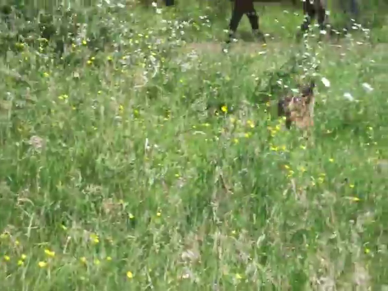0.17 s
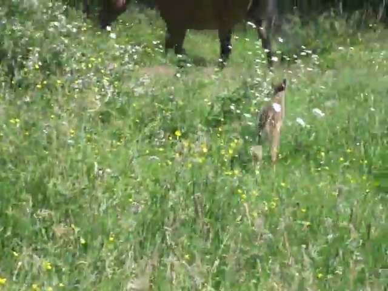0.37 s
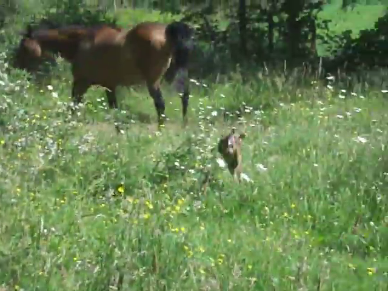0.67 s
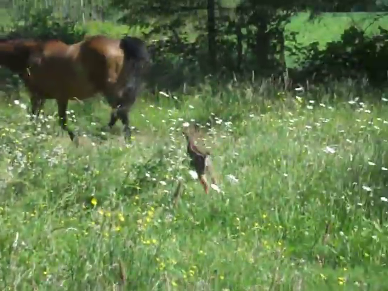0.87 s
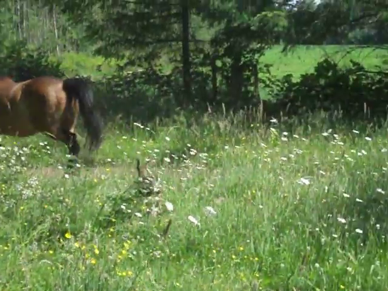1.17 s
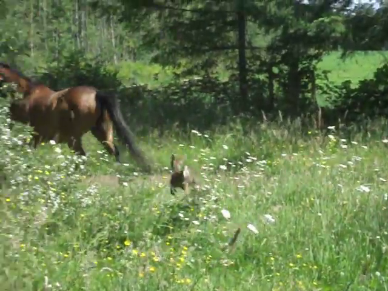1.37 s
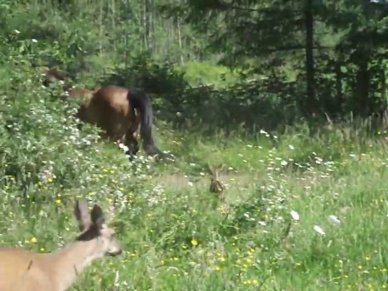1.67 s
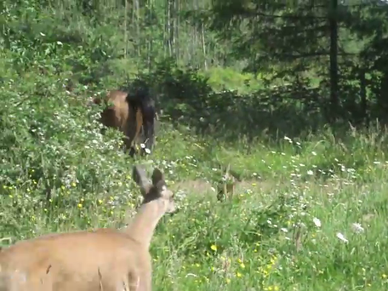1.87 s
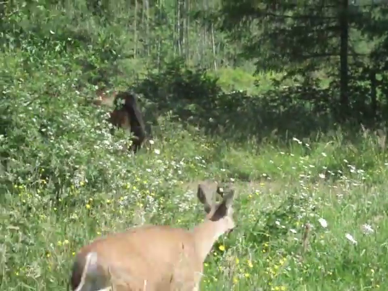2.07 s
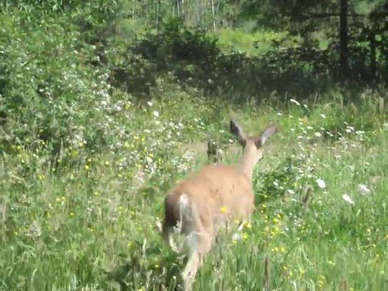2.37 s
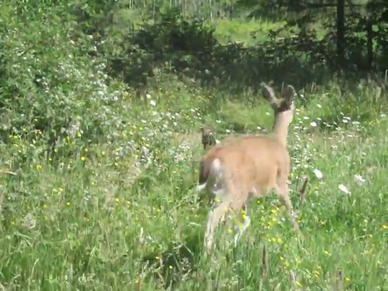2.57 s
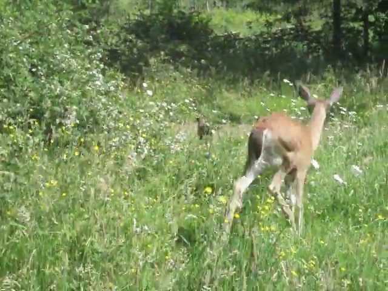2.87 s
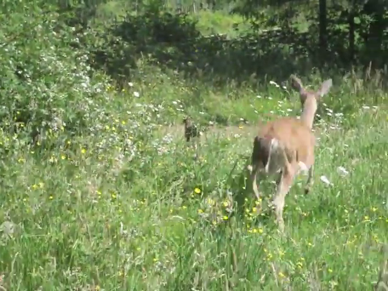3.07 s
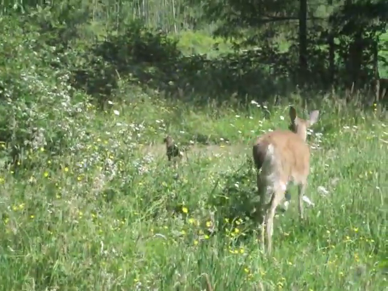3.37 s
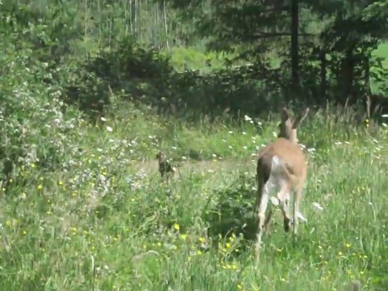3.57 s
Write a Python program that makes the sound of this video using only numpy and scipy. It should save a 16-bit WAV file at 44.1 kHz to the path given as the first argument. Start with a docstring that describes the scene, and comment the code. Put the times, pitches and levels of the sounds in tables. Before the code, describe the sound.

Uneven low wind flutter and thin leafy hiss outdoors, two hard overloaded plastic clicks near the start, later two short arched bird chirps with tree echoes and small crackling grass snaps between them.

```python
"""Gusts buffet the port of a small camera microphone in a meadow: bands of low noise with drawn levels, and one pop.
Grass and leaves hiss as noise with faint crackles; grass snaps under passing animals as short noise bursts.
A bird gives two arched chirps and a farther one whistles: gliding sines with scattered echoes from the trees.
The camera body clicks as ringing modes, loudly enough to overload the recorder. The microphone has a strong
presence peak and the recorder a low treble limit."""
import sys
import numpy as np
from scipy import signal
from scipy.fft import rfft, irfft
from scipy.io import wavfile

SR = 44100
rng = np.random.default_rng(int(sys.argv[2]) if len(sys.argv) > 2 else 0)


def gain_from_db(level_db):
    """Turn a decibel level (scalar or array-like) into a linear amplitude factor."""
    decades = np.asarray(level_db, float) / 20
    return 10 ** decades


def transcribe(u):
    """Save the signal u as a 16-bit wav file named by the first command-line argument.

    u: samples, shape (n,) or (channels, n), limited to [-1, 1]; the rate is SR.
    q: integer samples, one column per channel.
    """
    v = np.clip(np.atleast_2d(u).T, -1, 1)
    q = np.round(v * 32767).astype(np.int16)
    wavfile.write(sys.argv[1], SR, q)


N = 163611  # length in samples


def in_time(rows, column=1):
    """Control curve: linear interpolation of a column over the times in the first column."""
    rows = np.array(rows)
    return np.interp(np.arange(N) / SR, rows[:, 0], rows[:, column])


def rms_one(x):
    """Normalization of the mean power to 1."""
    return x / np.sqrt(np.mean(x ** 2) + 1e-20)


def drift(rate_hz):
    """Slow random fluctuation of rms 1: white noise through two equal real poles at rate_hz."""
    decimation = 40
    pole = np.exp(-2 * np.pi * rate_hz * decimation / SR)
    run_in = 2000
    white = rng.standard_normal(N // decimation + run_in + 2)
    slow = signal.lfilter([1], [1, -2 * pole, pole * pole], white)[run_in:]
    return np.interp(np.arange(N) / decimation, np.arange(len(slow)), rms_one(slow))


def noise_band(low_hz, high_hz):
    """Band-limited Gaussian noise of rms 1, taken after the filter has settled for a second."""
    sos = signal.butter(2, [low_hz, high_hz], "band", fs=SR, output="sos")
    return rms_one(signal.sosfilt(sos, rng.standard_normal(N + SR))[SR:])


def hiss():
    """Turbulent rustle of grass and leaves: patchy white noise plus a random train of crackle impulses."""
    # Each row: time in seconds, relative level in dB.
    hiss_rows = [(0.1, -35), (0.13, -32.5), (0.26, -33), (0.87, -33), (1.38, -33.5), (1.82, -33.5),
                 (2.36, -32.5), (2.64, -31.5), (3.04, -33.5), (3.49, -33), (3.7, -33.5)]
    crackles_per_s, crackle_db = 250, -18.5
    struck = rng.random(N) < crackles_per_s / SR
    size_db = 3.3 * rng.exponential(1, N).clip(0, 3)
    crackles = struck * rng.choice([-1, 1], N) * gain_from_db(size_db)
    patchy_db = 0.68 * drift(3.9)
    rustle = gain_from_db(in_time(hiss_rows) + 15.5 + patchy_db) * rng.standard_normal(N)
    return rustle + gain_from_db(crackle_db) * crackles


def trees():
    """Scattering from the tree line: sparse random echoes under exponential decay, total energy 1."""
    t60_s, delay_s, echoes_per_s = 0.44, 0.0089, 830
    t = np.arange(SR // 2) / SR
    sparse = (rng.random(len(t)) < echoes_per_s / SR) * rng.standard_normal(len(t))
    response = sparse * gain_from_db(-60 * t / t60_s) * (t > delay_s)
    return response / np.sqrt(np.sum(response ** 2))


def bird(calls, echo_db):
    """Frequency-modulated sine strokes that bend over at the top pitch, with their echoes by convolution."""
    rise_arch, fall_arch = 1.8, 2.6  # exponents: higher stays longer near the top pitch
    low_loss_db = 19  # low notes are weaker
    loudest_at = 0.43  # share of the way, in time, from the top pitch to the low one
    edge_s, hoarse = 0.004, 0.2  # soft ends; rms share of amplitude flicker
    out = np.zeros(N + SR)
    flicker = 1 + hoarse * drift(60)
    for start_s, length_s, from_hz, to_hz, db in calls:
        t = np.arange(int(length_s * SR)) / SR
        falling = from_hz > to_hz
        away = t / length_s if falling else 1 - t / length_s  # 0 at the top pitch, 1 at the low one
        arch = fall_arch if falling else rise_arch
        hz = max(from_hz, to_hz) - abs(to_hz - from_hz) * away ** arch
        loss_db = low_loss_db * ((away - loudest_at) / (1 - loudest_at)) ** 2
        ends = np.clip(np.minimum(t, length_s - t) / edge_s, 0, 1)
        first = int(start_s * SR)
        phase = 2 * np.pi * np.cumsum(hz) / SR
        out[first:first + len(t)] += gain_from_db(db - loss_db) * ends * np.sin(phase)
    direct = out[:N] * flicker
    return direct + gain_from_db(echo_db) * signal.fftconvolve(direct, trees())[:N]


def far_bird():
    """Short whistles from a distance, the scattered sound 9 dB under the direct."""
    # Each row: start in seconds, length in seconds, first pitch in Hz, last pitch in Hz, relative level in dB.
    whistle_rows = [(2.650, .03, 1300, 1690, -41), (2.678, .025, 1690, 1350, -41),
                    (2.715, .035, 1500, 1720, -44)]
    return gain_from_db(19.5) * bird(whistle_rows, echo_db=-9.0)


def near_bird():
    """Arched chirps of joined rising and falling strokes, the scattered sound 3 dB under the direct."""
    # Each row: start in seconds, length in seconds, first pitch in Hz, last pitch in Hz, relative level in dB.
    chirp_rows = [(1.991, .047, 1260, 2950, -13), (2.044, .021, 2824, 1500, -13),
                  (2.058, 0.02, 2794, 1900, -23), (3.264, .026, 1894, 2850, -19.5),
                  (3.269, .052, 1268, 3000, -14), (3.321, 0.019, 2864, 1500, -11.5),
                  (3.338, .016, 2685, 1800, -15)]
    return bird(chirp_rows, echo_db=-3.0)


def snaps():
    """Brittle fracture of grass: one impulse, then noise under a Gaussian decay, band-limited."""
    # Each row: start in seconds, relative level in dB, time in seconds for the noise to fall to 1/e.
    snap_rows = [(1.710, -32, 0.03), (2.555, -30.5, 0.021), (2.573, -33, 0.011), (2.590, -27, 0.0086),
                 (2.678, -36, .008), (2.784, -30, 0.01), (2.80, -36, .012), (2.898, -32, .014),
                 (2.959, -37.5, 0.0074), (1.814, -45, .008), (3.3625, -18, 0.0029), (3.51, -64, 0.0055)]
    first_break = 8.2  # impulse height over the rms of the noise at its start
    out = np.zeros(N + SR)
    for start_s, db, length_s in snap_rows:
        t = np.arange(int(4 * length_s * SR)) / SR
        burst = rng.standard_normal(len(t)) * np.exp(-(t / length_s) ** 2)
        burst[0] = first_break
        first = int(start_s * SR)
        out[first:first + len(t)] += gain_from_db(db) * burst
    sos = signal.butter(2, [1100, 3700], "band", fs=SR, output="sos")
    return gain_from_db(19.5) * signal.sosfilt(sos, out[:N])


def camera_clicks():
    """Modal synthesis: each noisy contact force excites the damped resonances of the plastic body."""
    # Each row: start in seconds, peak level in dB ahead of the bass cut, contact time constant in seconds,
    # tilt of the modes in dB per octave.
    click_rows = [(.4419, 2, .0013, -.5), (.4619, -2, .0006, 4.0), (.5140, 4, .0017, 1.5),
                  (.5186, -1, .0009, 2.5)]
    # Modes of the body. Each row: frequency in Hz, relative level in dB, 60 dB decay time in seconds.
    body_modes = [(720, -27.5, 0.018), (972, -22, 0.021), (1231, -13.5, 0.013), (1730, -17, 0.013),
                  (1854, -13, 0.023), (2246, -6.5, 0.0072), (2530, -5, 0.014), (2962, -3.5, 0.015),
                  (3500, -9.5, 0.0058), (4490, -21.5, 0.0048)]
    out = np.zeros(N)
    t = np.arange(SR // 20) / SR
    for start_s, peak_db, contact_s, tilt_db in click_rows:
        force_shape = np.sqrt(t / contact_s) * np.exp(-(t / contact_s) ** 2)
        force = rng.standard_normal(len(t)) * force_shape + 1e-18
        rung = 0
        for k, (hz, db, t60_s) in enumerate(body_modes):
            radius, angle = gain_from_db(-60 / (t60_s * SR)), 2 * np.pi * hz / SR
            poles = [1, -2 * radius * np.cos(angle), radius * radius]
            mode = signal.lfilter([0, np.sin(angle)], poles, force)
            gain = (-1) ** k * gain_from_db(db + tilt_db * np.log2(hz / 3500))  # neighbours in opposite polarity
            rung = rung + gain * mode / np.abs(mode).max()
        first = int(start_s * SR)
        out[first:first + len(t)] += gain_from_db(peak_db) * rung / np.abs(rung).max()
    # little bass gets through
    return signal.sosfilt(signal.butter(2, 400, "high", fs=SR, output="sos"), out)


def pop():
    """Impulse response of a second-order low-pass: one eddy pops on the port as a dull pressure kick."""
    start_s, level_db, corner_hz = 2.279, -10, 222
    kick = np.zeros(N) + 1e-18
    kick[int(start_s * SR)] = gain_from_db(level_db) * SR / (2 * np.pi * corner_hz)  # offsets the filter's loss of height
    return signal.sosfilt(signal.butter(2, corner_hz, fs=SR, output="sos"), kick)


def wind():
    """Turbulent pressure on the port: slow swell plus eddy flutter whose spectrum falls with frequency."""
    # Slow swell. Each row: time in seconds, relative level in dB.
    swell_rows = [(0.04, -16), (0.08, -19), (0.13, -38), (0.15, -28.5), (0.32, -18), (0.44, -33),
                  (0.7, -25), (0.74, -38.5), (1.06, -25.5), (1.27, -34), (1.52, -22.5), (1.57, -31.5),
                  (1.6, -25.5), (1.94, -25.5), (1.97, -23.5), (2.18, -29.5), (2.29, -19.5), (2.33, -32),
                  (2.84, -26.5), (2.88, -47.5), (3.06, -30), (3.1, -30.5), (3.32, -28.5), (3.52, -18),
                  (3.64, -44.5), (3.7, -20)]
    # Faster eddies. Each row: time in seconds, relative level in dB, sharpness as relative dB of the upper part.
    flutter_rows = [(0.04, -39.5, -7.5), (0.13, -42, -19.5), (0.3, -14.5, -5.5), (0.44, -40.5, -8),
                    (0.59, -30.5, -8), (0.61, -23, -23.5), (0.66, -31, -3), (0.72, -24, -22.5),
                    (0.84, -33.5, -6), (0.95, -20, -26), (0.99, -30.5, -14), (1.19, -32, -14.5),
                    (1.24, -24, -21), (1.34, -37.5, -10), (1.38, -31.5, -25), (1.51, -20.5, -6.5),
                    (1.59, -31, -2.5), (1.64, -15, -15), (1.71, -31, -2), (1.76, -15.5, -23),
                    (1.8, -27.5, -5), (1.88, -19.5, -3.5), (2.0, -17.5, 1), (2.06, -45.5, -20),
                    (2.09, -25.5, -27), (2.19, -46, -9.5), (2.22, -26.5, -22), (2.28, -8.5, -6.5),
                    (2.35, -40, -15), (2.38, -52, -3.5), (2.47, -13, -12), (2.51, -35.5, -26),
                    (2.55, -11, -13.5), (2.59, -37.5, -15), (2.71, -38, -16.5), (3.03, -13.5, -18),
                    (3.07, -26.5, -24), (3.1, -29, -8), (3.31, -38, -16), (3.36, -13.5, -12),
                    (3.51, -15, -18.5), (3.59, -24, -25), (3.61, -22.5, -20), (3.7, -23.5, -5)]
    corner_hz, lumpy_db = 100.6, 2.0  # amplitude halves at the corner; rms of the level fluctuation
    sharp_db = in_time(flutter_rows, column=2)
    sharp_db = sharp_db - sharp_db.mean()
    edges_hz = 45 * 2 ** np.arange(0, 3.6, 0.5)  # half-octave bands
    eddies = 0
    for low_hz, high_hz in zip(edges_hz, edges_hz[1:]):
        above = np.sqrt(low_hz * high_hz) / corner_hz
        # sharpness acts more and more toward the upper bands
        lift_db = sharp_db * np.clip(0.57 + 1.2 * np.log2(above), 0, 1.1)
        level = gain_from_db(lift_db + lumpy_db * drift(25)) / (1 + above ** 4.6)
        eddies = eddies + noise_band(low_hz, high_hz) * level
    flutter = gain_from_db(in_time(flutter_rows) - 2.5) * eddies
    swell = gain_from_db(in_time(swell_rows) + 4.0) * noise_band(8, 45)
    return flutter + swell


def microphone(air):
    """Minimum-phase filtering: folding the cepstrum makes the magnitude response causal."""
    # Response with a presence peak. Each row: frequency in Hz, gain in dB.
    response_rows = [(120, -30.5), (250, -17.5), (420, -16.5), (690, -19), (1000, -17), (1200, -15.5),
                     (1380, -11), (1560, -17), (1690, -13), (1860, -17.5), (2100, -11.5), (2500, -11),
                     (2840, 3), (3150, -6.5), (3480, -16), (4200, -27), (4500, -24), (4800, -27),
                     (5400, -29.5), (5800, -31.5), (6300, -45), (9000, -76)]
    size = 8192
    hz, db = np.transpose(response_rows)
    f = np.maximum(np.arange(size // 2 + 1) * SR / size, 1)
    gain_db = np.maximum(np.interp(np.log(f), np.log(hz), db), -70)
    cepstrum = irfft(np.log(gain_from_db(gain_db)))
    cepstrum[1:size // 2] *= 2
    cepstrum[size // 2 + 1:] = 0
    impulse = irfft(np.exp(rfft(cepstrum)))
    return signal.fftconvolve(air, impulse)[:N]


def scene():
    """Superposition: airborne sounds take the microphone's colour; wind and clicks enter by port and body."""
    air = hiss() + far_bird() + near_bird() + snaps()
    return (microphone(air) + camera_clicks() + pop() + wind())[None]


def band_limit(x):
    """A steep low-pass at the top of the band."""
    return signal.sosfilt(signal.butter(12, 16600, fs=SR, output="sos"), x)


def record(dry):
    """Band limiting and saturation: low-pass, silent start with a fade-up, then uneven hard clipping."""
    top_hz, open_s, fade_s = 6500, 0.031, 0.044
    t = np.arange(N) / SR
    limited = signal.sosfilt(signal.cheby2(10, 50, top_hz, fs=SR, output="sos"), dry)
    fade = (t > open_s) * np.clip(0.05 + (t - open_s) / fade_s, 0, 1)
    mix = np.clip(limited * fade, -0.7, 0.735)
    return band_limit(mix)


dry = scene()
out = record(dry)
transcribe(out)
```